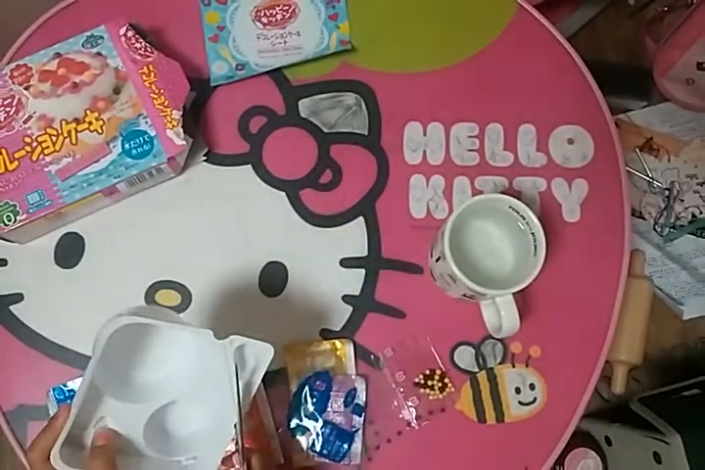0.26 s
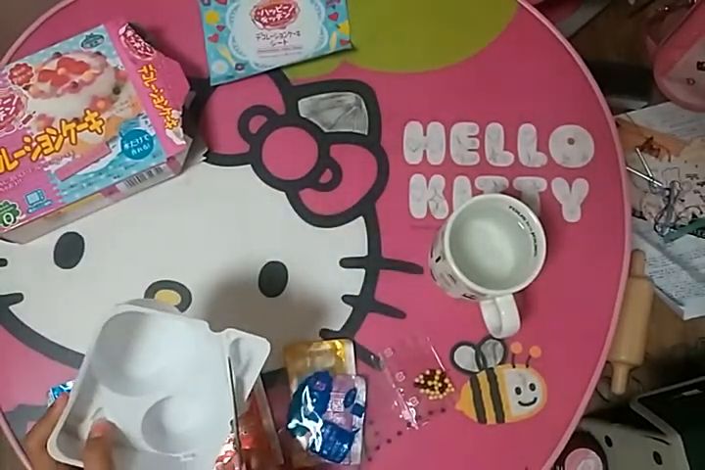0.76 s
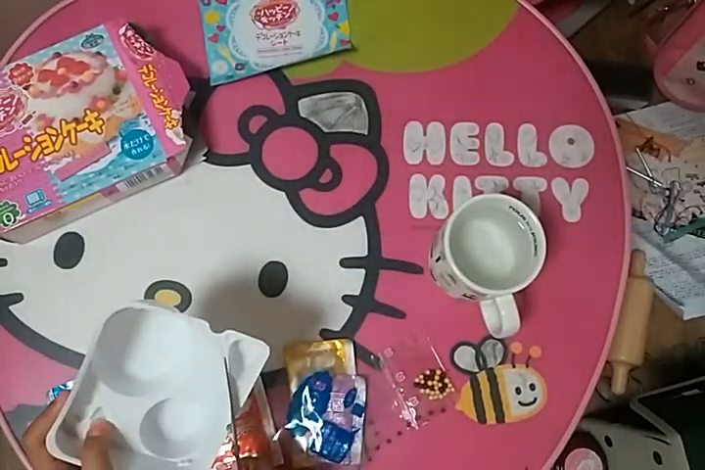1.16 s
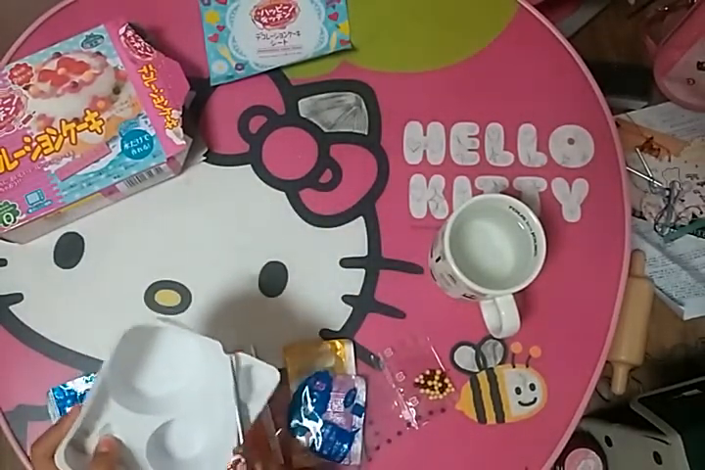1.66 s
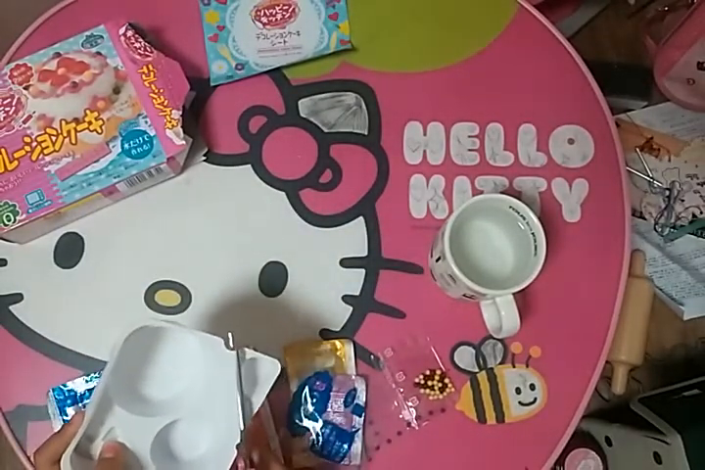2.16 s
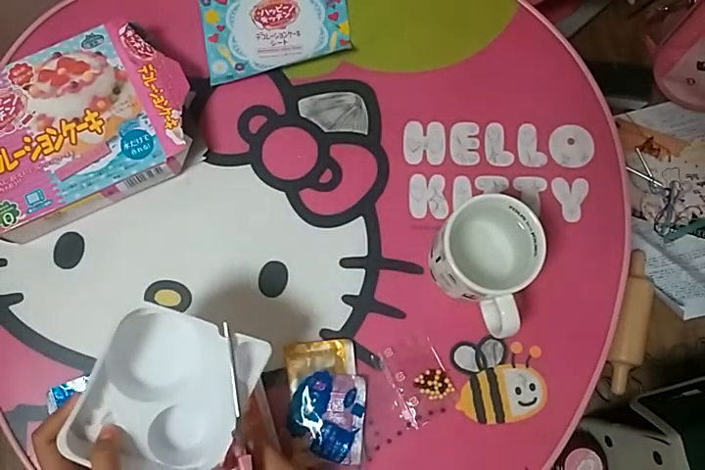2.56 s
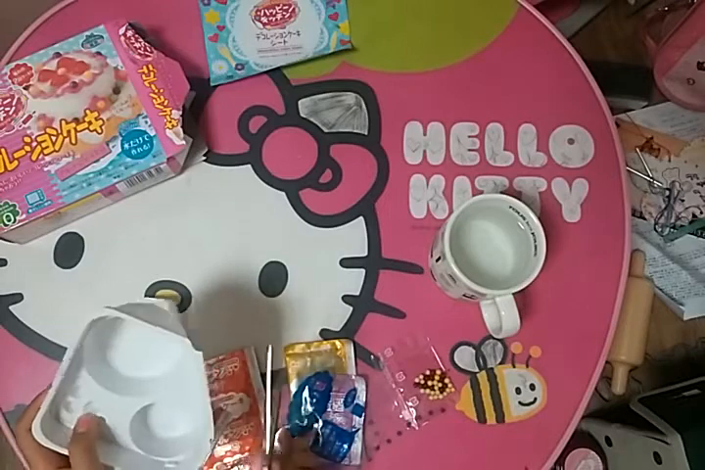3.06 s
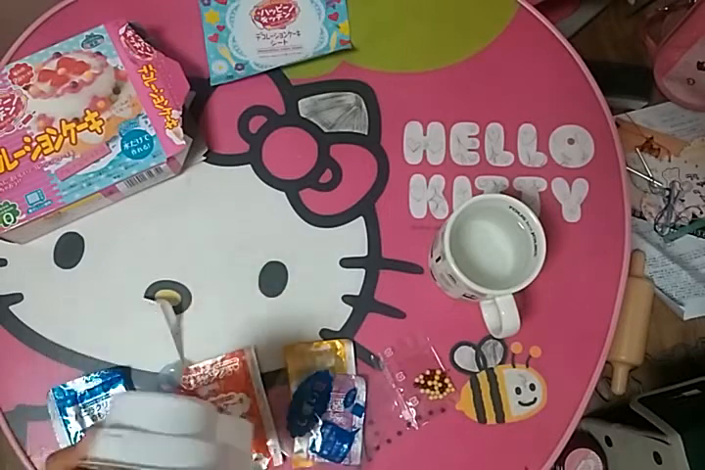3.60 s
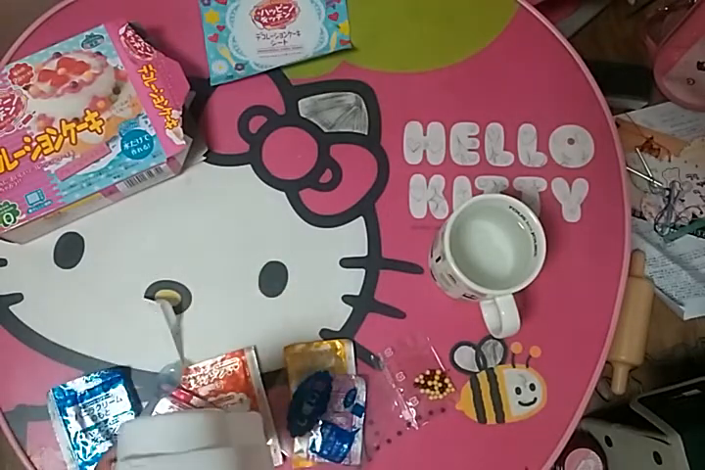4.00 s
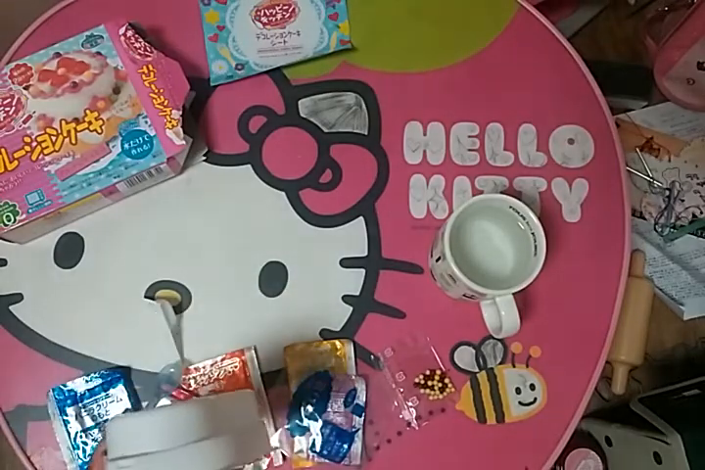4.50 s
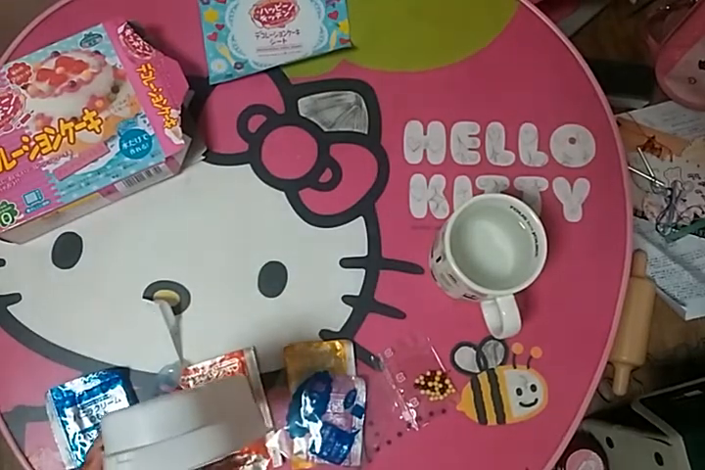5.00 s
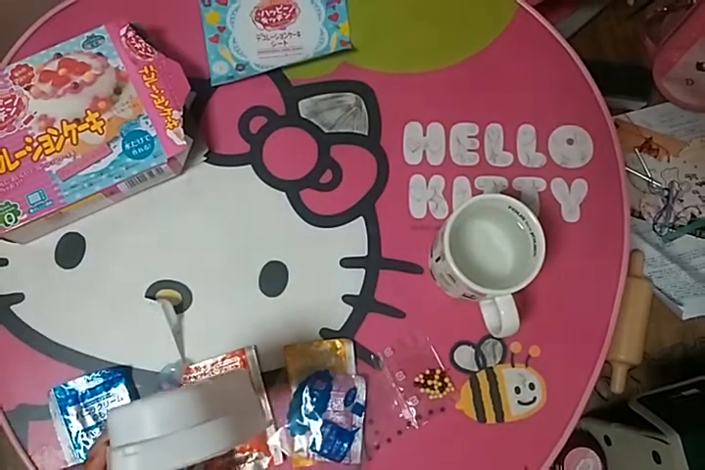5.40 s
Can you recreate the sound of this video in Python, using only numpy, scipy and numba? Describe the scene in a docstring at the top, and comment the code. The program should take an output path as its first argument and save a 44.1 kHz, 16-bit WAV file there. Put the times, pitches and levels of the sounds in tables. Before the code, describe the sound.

Scissors cut through a thin plastic tray indoors, with irregular crackles, short rasps and a few sharp snaps over a faint low hum.

```python
"""In a small room, scissors shear through a thin moulded plastic tray held over a table, half a metre
below the microphone. Stick-slip friction of the blades drives the tray's modes continuously, while
fracture excites them impulsively: the stiff sheet cracks and pops as it parts and flexes.
A brief reverberation follows, over a motor hum, a wavering rumble, pressure drift and hiss."""
import sys
import numpy as np
from scipy import signal
from scipy.fft import rfft, irfft
from scipy.io import wavfile
from scipy.ndimage import uniform_filter1d
from numba import njit

SR = 44100
rng = np.random.default_rng(int(sys.argv[2]) if len(sys.argv) > 2 else 0)


def digitize_waveform(pressure):
    """Quantize a signal to 16-bit integers and store it at the path in sys.argv[1].

    Rows of a 2-D input are taken as channels; values are limited to [-1, 1].
    """
    field = np.atleast_2d(pressure).T
    bounded = np.clip(field, -1, 1)
    quanta = np.round(bounded * 32767).astype(np.int16)
    wavfile.write(sys.argv[1], SR, quanta)


N = 249165
TIME = np.arange(N) / SR

# Cracks of the sheet. Each row: start in seconds, upper-mode level in dB, favoured upper frequency in Hz,
# its emphasis in dB, middle-mode, lower-mode and tabletop levels in dB, tearing time in ms.
CRACKS = [(0.3544, -82, 2870, 7.5, -70, -58, -81, 2.4), (0.5294, -78, 3790, 7, -76, -61.5, -62, 2.6),
          (0.9094, -80, 2870, 9.5, -70, -63, -57.5, 6.4), (1.0677, -59, 4170, 25, -61.5, -69, -82, 3.4),
          (1.257, -55, 3990, -5, -64, -67, -86, 1.1), (1.3089, -45.5, 3980, 12, -54, -51, -81, 5.3),
          (1.3293, -57, 4050, -5, -65, -76, -76, 1.8), (1.3733, -46, 4040, 20, -55.5, -91, -76, 3.4),
          (1.4566, -36, 4330, 23.5, -46.5, -50, -58, 2.9), (1.5227, -54.5, 4600, 16, -51.5, -58, -79, 2.3),
          (1.6676, -42.5, 5940, -13, -65, -53, -89, 4.8), (1.9894, -70, 2780, 14, -79, -60, -51, 1.9),
          (2.3281, -52, 4340, 15, -61, -58, -66, 1.7), (2.5003, -37, 4360, 13, -47.5, -50, -77, 2.3),
          (2.6403, -55, 5400, 5, -75.5, -57, -76, 4.1), (2.682, -48.5, 5730, 20, -59.5, -63.5, -75, 4),
          (2.7019, -10.5, 4820, 20, -9.5, -21.5, -34, 3.9), (2.775, -16.5, 3570, 13.5, -44, -26, -30, 2.45),
          (2.8744, -22, 4600, 51, -42.5, -47, -49, 5.1), (2.9428, -30.5, 4650, 26, -39.5, -32.5, -37, 1.95),
          (2.9584, -36.5, 4330, 12, -51, -70, -44, 4), (3.022, -31.5, 4570, 46, -33, -37, -42, 2.08),
          (3.0595, -35.5, 5200, 18, -51, -46, -72, 3.3), (3.1, -61, 5100, 10, -56, -48, -48, 4),
          (3.1626, -38.5, 5100, 32, -58, -51, -48.5, 3.0), (3.2142, -40, 4550, 36, -58, -56.5, -59, 3.1),
          (3.2507, -55, 3490, 20, -59, -43.5, -56, 2.6), (3.47, -30, 4930, 12.5, -28.5, -29.5, -50.5, 2.95),
          (3.5428, -51, 4540, 2, -45, -39, -75, 3.03), (3.5819, -42.5, 4700, 25, -32.5, -44.5, -85, 5.9),
          (3.7617, -26.5, 4330, 29.5, -29.5, -29.5, -68, 1.04),
          (3.7778, -54, 2930, 7, -39.5, -39, -71, 3.5), (3.8657, -48, 3540, 26, -62, -42.5, -61, 4.9),
          (3.9281, -46, 4560, 28, -47, -34.5, -62, 2.35),
          (3.9571, -41.5, 2980, 27, -46.5, -46, -67.5, 2.85),
          (4.112, -54, 3990, 11.5, -46.5, -50.5, -78, 6.1),
          (4.2474, -48, 4200, 16.5, -37.5, -53, -80, 10.5),
          (4.3801, -71.5, 2920, 10, -48.5, -55.5, -70.5, 1.4),
          (4.5365, -51.5, 3850, 21.5, -46.5, -42, -78.5, 2.7),
          (4.8294, -61, 2965, 12.5, -69.5, -75.5, -65.5, 2.5),
          (5.42, -28.5, 4950, -6, -26.5, -23, -42, 1.7), (5.4233, -14, 5340, -3.5, -23, -25.5, -48, 3.2)]

def cracks():
    """Impulsive excitation: each crack is a fracture force convolved with the impulse responses."""
    out = np.zeros(N + SR)
    for start, upper_db, upper_hz, emphasis_db, middle_db, lower_db, table_db, tear_ms in CRACKS:
        force = fracture_force(tear_ms)
        tick = edge_tick()
        tick_db = -3 + 1.4 * upper_db - .3 * emphasis_db  # strongest in loud, weakly pitched cracks
        responses = np.array([*struck_modes(start, upper_hz, emphasis_db), tick])
        sounds = signal.fftconvolve(force, responses, axes=1)
        peak_rms = np.sqrt(uniform_filter1d(sounds ** 2, size=200).max(axis=1))
        gains = undb([upper_db, middle_db, lower_db, table_db, tick_db]) / peak_rms
        add(out, gains @ sounds, int(start * SR) - 40)
        # the walls receive the rush from all sides, blurred into one blow of the same energy
        blow = gains * np.linalg.norm(sounds, axis=1) / np.linalg.norm(responses, axis=1)
        add(out, room(blow @ responses), int((start + tear_ms / 2000) * SR))
    return out[:N]


def fracture_force(tear_ms):
    """Brittle fracture: tiny breaks crowd into one rush, then the freed sheet chatters more weakly."""
    t = TIME[:SR // 20]
    progress = t / (tear_ms / 1000)
    rush = progress ** .66 * np.exp(-progress ** 1.7)
    chatter = undb(-14) * np.minimum(progress, 1) * np.exp(-t / .01)
    breaks = rng.standard_normal((5, len(t)))  # a row for each mode family and one for the tick
    return breaks * undb(3.9 * rng.exponential(size=len(t))) * (rush + chatter)


def edge_tick():
    """A short transient has a broad spectrum: the edge gives a bright tick."""
    t = TIME[:SR // 8]
    burst = rng.standard_normal(len(t)) * np.exp(-t / .00041)
    return band(band(burst, 12000, 9900), 12000, 9900)


# Modes of the tray, in three families, and of the tabletop under it.
# Each row: frequency in Hz, time to decay by 60 dB in seconds, relative level in dB.
UPPER_MODES = [(2960, 0.013, -6.5), (3150, 0.013, -2), (3425, 0.011, -1.5), (3903, 0.0061, 5),
               (4454, 0.0055, 6), (4880, 0.011, 2), (5253, 0.0098, 6.5), (5600, 0.0073, 5),
               (6290, 0.0031, 9), (6530, 0.01, -0.5), (7520, .004, 2), (8150, 0.0053, -4)]
MIDDLE_MODES = [(1470, 0.0024, -2.5), (1700, .012, -6.5), (1944, 0.012, 1), (2050, 0.12, -8.5),
                (2100, 0.012, 8), (2387, 0.025, -10.5), (2570, 0.004, 3.5)]
LOWER_MODES = [(410.2, 0.039, -19.5), (479, 0.031, 4), (620, 0.015, 6.5), (770, 0.052, 0),
               (970, 0.0094, 13), (1028, 0.043, -3), (1270, 0.069, -7.5)]
TABLETOP_MODES = [(138, .09, -4), (195, 0.064, -4), (214, 0.072, 6)]
# The hand's shifting hold. Each row: time in seconds, favoured lower frequency in Hz.
GRIP = [(0, 1000), (.5, 996), (1, 480), (2.35, 450), (2.48, 1200), (2.9, 980), (3.9, 954), (4.3, 781),
        (4.9, 944.6), (5.4, 480), (5.65, 480)]
GRIP_EMPHASIS_DB = 6.5

def struck_modes(start, upper_hz, emphasis_db):
    """Selective excitation: the crack's pitch weights upper and middle modes, the grip the lower ones."""
    return (ring(UPPER_MODES, upper_hz, emphasis_db),
            ring(MIDDLE_MODES, .46 * upper_hz, emphasis_db=5),
            ring(LOWER_MODES, curve(GRIP, start), GRIP_EMPHASIS_DB),
            ring(TABLETOP_MODES))


def ring(modes, favoured_hz=1000, emphasis_db=0):
    """Free vibration is a sum of damped sines; flexing detunes and rebalances them at each blow."""
    hz, t60, db = np.transpose(modes)[:, :, None]
    t = TIME[:SR // 8]
    detune, imbalance = rng.standard_normal((2, len(modes), 1))
    levels = db + emphasis_db * nearness(hz, favoured_hz) + 2 * imbalance
    waves = np.sin(2 * np.pi * hz * (1 + .015 * detune) * t) * decay(t, t60)
    return radiate(np.sum(undb(levels) * waves, axis=0), modes)


def nearness(hz, favoured_hz, octaves=.3):
    """Modal weighting: emphasis falls as a Gaussian of the interval from the favoured pitch."""
    return np.exp(-(np.log2(hz / favoured_hz) / octaves) ** 2)


def radiate(x, modes):
    """Band-limited radiation: a family of modes gives little outside its own range."""
    edges_hz = modes[0][0] / 1.15, modes[-1][0] * 1.2
    return signal.sosfilt(signal.butter(2, edges_hz, "bandpass", fs=SR, output="sos"), x)


# Swells of rasp and squeal: blade strokes, rubs, and the sheet's chatter after cracks.
# Each row: peak, rise and fall times in seconds, squeal level in dB, squeal centre in Hz,
# its quality factor, middle and lower rasp levels in dB.
SWELLS = [(.4, 0.27, 0.34, -87, 4000, 3, -78, -74.5), (.9, 0.17, 0.19, -84, 4000, 2.7, -80, -69.5),
          (1.2, 0.23, 0.036, -72.5, 4230, 2.4, -70.5, -73), (1.262, 0.037, .02, -52, 4480, 1.9, -60, -81),
          (1.33, 0.024, 0.073, -45.5, 4354, 2.9, -57, -59.5), (1.5, 0.053, 0.053, -55, 4510, 4, -55, -69),
          (1.601, 0.011, .03, -61, 4295, 3, -62, -55), (1.68, 0.027, 0.13, -43, 4974, 2, -52, -51.5),
          (1.8, 0.12, 0.06, -46, 4900, 2.2, -54.5, -55), (2.01, 0.046, 0.13, -83, 4200, 3, -80, -74),
          (2.14, 0.027, 0.053, -63.5, 4040, 8, -72, -70), (2.226, 0.019, 0.021, -48, 4124, 8.5, -56, -77),
          (2.274, 0.051, 0.038, -49.5, 4140, 5.9, -58, -84),
          (2.334, 0.02, 0.12, -51.5, 4320, 7.1, -57, -75), (2.39, 0.13, 0.052, -50, 4300, 5.2, -56, -63),
          (2.531, 0.044, 0.17, -61, 4400, 1.9, -67, -66),
          (2.688, 0.056, 0.011, -55.5, 5590, 1.8, -65, -62.5), (2.925, 0.018, .03, -42, 4488, 3, -52, -59),
          (2.948, 0.015, 0.018, -42.5, 4770, 5.1, -43, -41.5),
          (3.045, .02, 0.25, -55, 4453, 3, -47.5, -53.5), (3.165, .02, 0.12, -53.5, 4990, 3.8, -50, -59),
          (3.23, 0.12, .06, -58.5, 4825, 4, -55, -62.5), (3.44, 0.29, .03, -63, 4940, 3, -67.5, -70.5),
          (3.489, 0.021, 0.1, -44.5, 4797, 1.9, -48, -61.5),
          (3.54, 0.063, 0.09, -50.5, 4720, 1.75, -49.5, -52.5),
          (3.589, 0.016, 0.019, -34.5, 4283, 1.95, -39, -43.5),
          (3.68, .2, 0.076, -70.5, 4200, 2.5, -67.5, -67.5),
          (3.788, 0.015, 0.037, -45, 4470, 3.3, -45.5, -51), (3.9, 0.12, 0.1, -56.5, 4086, 2.5, -50, -48.5),
          (3.964, 0.044, 0.034, -49, 4110, 2.6, -49.5, -46.5),
          (4.01, 0.036, 0.076, -66, 4000, 2.6, -67.5, -60), (4.122, 0.052, 0.087, -58, 3960, 2.9, -58, -48),
          (4.259, 0.041, 0.06, -47, 4100, 2.6, -45, -40), (4.385, 0.03, 0.086, -62, 3967, 3, -57.5, -47.5),
          (4.59, .05, 0.21, -69, 4016, 2.7, -66, -68.5)]
SWELL_RANGE_DB = 20  # gained over the rise time, lost over the fall time

def rasp_and_squeal():
    """Sustained excitation: dense slips drive a squeal in a moving band and two rasps, all in swells."""
    slips = stick_slip()
    peak, rise, fall, squeal_db, centre_hz, quality, middle_db, lower_db = np.transpose(SWELLS)
    coarse_time = TIME[::40]
    since_peak = coarse_time[:, None] - peak
    from_peak = np.maximum(-since_peak / rise, since_peak / fall)
    envelopes = undb(-SWELL_RANGE_DB * from_peak ** 1.2)  # a power above 1 lingers near the peak
    hz = np.interp(TIME, peak, centre_hz)
    width = hz / np.interp(TIME, peak, quality)
    # a narrow band passes less of the slips, so its level is made up by the root of its width
    squeal = moving_band(moving_band(slips, hz, width), hz, width) / np.sqrt(width)
    grip_hz = curve(GRIP)
    held_modes = [(f, t60, db + GRIP_EMPHASIS_DB * nearness(f, grip_hz)) for f, t60, db in LOWER_MODES]
    layers = ((squeal_db, resonate(squeal, UPPER_MODES)),
              (middle_db, resonate(slips, MIDDLE_MODES)),
              (lower_db, resonate(slips, held_modes)))
    direct = np.zeros(N)
    for db, sound in layers:
        strongest_swell = (envelopes * undb(db)).max(axis=1)
        direct += np.interp(TIME, coarse_time, strongest_swell) * sound
    return direct + room(direct)[:N]


def stick_slip():
    """Stick-slip friction: the surfaces catch and release in dense, uneven impulses."""
    slips = rng.standard_normal(N) * undb(1.7 * rng.exponential(size=N))
    slips *= rng.random(N) < .25
    slips *= undb(3.6 * waver(90))
    # the hand sets the pressure: bursts and gaps average out within a few hundredths of a second
    return slips / np.sqrt(uniform_filter1d(slips ** 2, size=2200))


def resonate(force, modes):
    """Forced vibration: each mode passes a band whose width is inverse to its decay time."""
    response = sum(undb(db) * band(force, hz, width=3 / t60) for hz, t60, db in modes)
    return unit(radiate(response, modes))


# Decay of the room. Each row: band centre in Hz, reverberation time in seconds.
ROOM_DECAY = [(300, .22), (1200, .17), (4000, 0.11), (11000, 0.2)]
ROOM_DB, ROOM_GAP_S = -4.5, .0016

def room(x):
    """Diffuse reverberation follows a short gap; the tray keeps moving, so no two tails are alike."""
    t = TIME[:SR // 3]
    tail = sum(band(rng.standard_normal(len(t)), hz, 1.07 * hz) * decay(t, t60) for hz, t60 in ROOM_DECAY)
    tail *= 1 - np.exp(-(t / ROOM_GAP_S) ** 2)
    return signal.fftconvolve(x, undb(ROOM_DB) * tail / np.linalg.norm(tail))


# Response of capsule and casing to near sounds. Each row: frequency in Hz, gain in dB.
MICROPHONE_RESPONSE = [(120, -10), (200, -6), (6000, -2), (7500, -3.5), (9000, -13), (11000, -19),
                       (16000, -14.5)]

def microphone(x):
    """Minimum-phase filtering: the folded cepstrum of the log gain gives a causal colouring."""
    freqs = np.fft.rfftfreq(2048, 1 / SR) + 1
    cepstrum = irfft(np.log(spectral_gain(freqs, MICROPHONE_RESPONSE)))
    cepstrum[1:1024] *= 2
    cepstrum[1025:] = 0
    impulse_response = irfft(np.exp(rfft(cepstrum)))
    return signal.fftconvolve(x, impulse_response)[:N]


# Course of the motor's hum. Each row: time in seconds, frequency in Hz, level in dB.
MOTOR_HUM = [(0, 74.3, -81), (1.2, 75.5, -73), (2.101, 83.5, -63.5), (2.8, 86.1, -56.5),
             (4.001, 86.84, -63.5), (5.65, 87, -59.5)]

def motor_hum():
    """Periodic rotation gives a tone, which rises as the motor slowly speeds up."""
    times, hz, db = np.transpose(MOTOR_HUM)
    return tone(np.interp(TIME, times, hz)) * undb(np.interp(TIME, times, db) + 1.5 * waver(15))


# Course of the rumble. Each row: time in seconds, level in dB.
RUMBLE_LEVELS = [(0.0, -54), (0.11, -57), (1.2, -67), (1.45, -50), (1.95, -65), (2.0, -39), (2.25, -63.5),
                 (2.38, -45.5), (2.42, -59), (2.64, -50), (2.82, -65), (2.85, -48), (3.87, -67.5),
                 (4.25, -46.5), (4.28, -61), (4.66, -55.5), (4.69, -44.5), (5.1, -62.5), (5.16, -50.5),
                 (5.65, -65)]

def rumble():
    """Random modulation of amplitude and frequency makes a low tone waver."""
    level_db = curve(RUMBLE_LEVELS) + 1.5 * waver(11)
    return tone(hz=52 + 2.2 * waver(8)) * undb(level_db)


def pressure_drift(hz=5, width=3.7):
    """Infrasound: the air pressure wanders as narrow-band noise below the range of hearing."""
    drift = band(band(rng.standard_normal(N), hz, width), hz, width)
    return unit(drift) * undb(-47 + 5.5 * waver(3))


# Spectrum of the hiss. Each row: frequency in Hz, relative spectral density in dB.
HISS_SPECTRUM = [(15, -11), (28, -14), (38, -7), (62, -8), (105, -12), (130, -23.5), (400, -29),
                 (1000, -33.5), (2500, -37.5), (5500, -40), (7000, -45), (9000, -52.5), (16000, -55.5)]
HISS_DB = -65.5  # level of the part above 100 Hz

def hiss():
    """Microphone self-noise: a nearly steady random signal whose density falls towards the treble."""
    freqs = np.fft.rfftfreq(N, 1 / SR) + 1
    colour = spectral_gain(freqs, HISS_SPECTRUM)
    colour /= np.sqrt(np.mean((colour * (freqs > 100)) ** 2))
    noise = irfft(rfft(rng.standard_normal(N)) * colour, N)
    return noise * undb(HISS_DB + .6 * waver(5.9))


def undb(db):
    """Decibels to gain."""
    return 10 ** (np.asarray(db) / 20)


def unit(x):
    """Normalisation to rms 1."""
    return x / np.sqrt(np.mean(x ** 2))


def decay(t, t60):
    """Exponential damping by 60 dB in t60 seconds."""
    return np.exp(-np.log(1000) * t / t60)


def tone(hz):
    """Phase is the integral of frequency: a gliding sine of rms 1."""
    return np.sqrt(2) * np.sin(2 * np.pi * np.cumsum(hz) / SR)


@njit
def moving_band(x, hz, width):
    """Two-integrator resonator: a band-pass whose centre and width in Hz may move every sample."""
    out, band_state, low_state = np.empty(len(x)), 0., 0.
    for i in range(len(x)):
        tuning, damping = np.tan(np.pi * hz[i] / SR), width[i] / hz[i]
        passed = (band_state + tuning * (x[i] - low_state)) / (1 + tuning * (tuning + damping))
        band_state = 2 * passed - band_state
        low_state += 2 * tuning * passed
        out[i] = damping * passed
    return out


def band(x, hz, width):
    """Resonator of constant centre and width in Hz."""
    return moving_band(x, np.full(len(x), float(hz)), np.full(len(x), float(width)))


def waver(rate_hz):
    """Low-pass noise of rms 1: random steps, smoothed twice."""
    hold = int(SR / rate_hz)
    steps = np.repeat(rng.standard_normal(N // hold + 1), hold)
    return unit(uniform_filter1d(uniform_filter1d(steps, hold), hold)[:N])


def curve(points, t=TIME):
    """Linear interpolation of (seconds, value) points."""
    return np.interp(t, *np.transpose(points))


def spectral_gain(freqs, points):
    """Gain by interpolation of (Hz, dB) points on a log-frequency axis."""
    hz, db = np.transpose(points)
    return undb(np.interp(np.log(freqs), np.log(hz), db))


def add(out, sound, start):
    """Superposition of a sound on a track, from a start sample."""
    out[start:start + len(sound)] += sound


def scene():
    """Superposition: tray and blades, coloured by the microphone, sound over the background."""
    cutting = microphone(cracks() + rasp_and_squeal())
    background = motor_hum() + rumble() + pressure_drift() + hiss()
    return (cutting + background)[None]


def record(dry):
    """Soft saturation in the input stage rounds the loudest peak; a steep low-pass cuts the top."""
    rounded = dry / (1 + dry ** 8) ** (1 / 8)
    low_pass = signal.ellip(10, .2, 70, 15950, fs=SR, output="sos")
    return .97 * signal.sosfilt(low_pass, rounded)


dry = scene()
out = record(dry)
digitize_waveform(out)
```